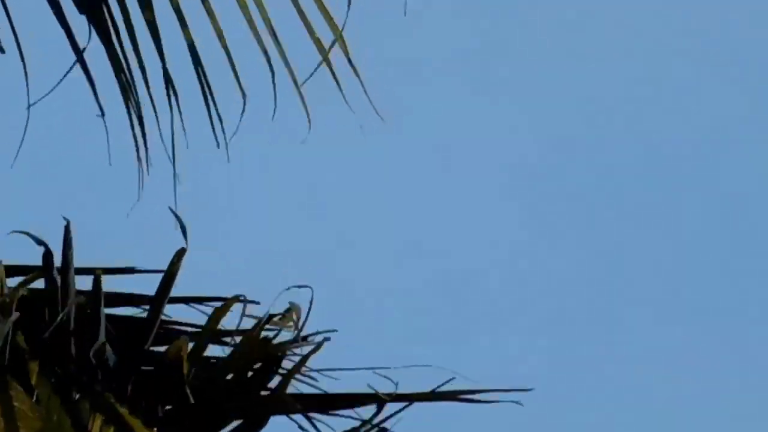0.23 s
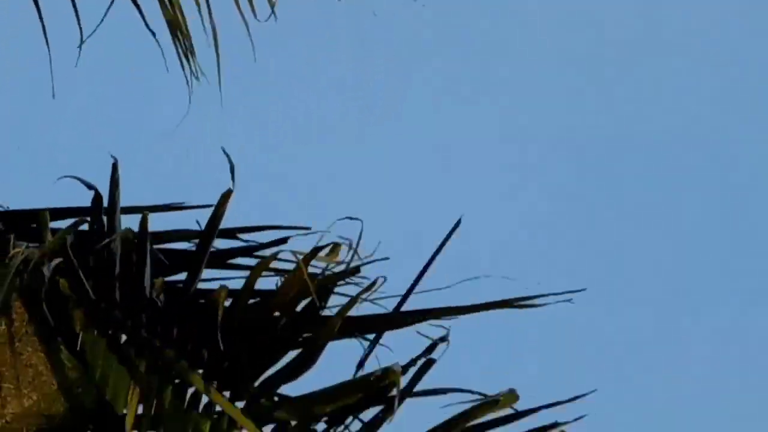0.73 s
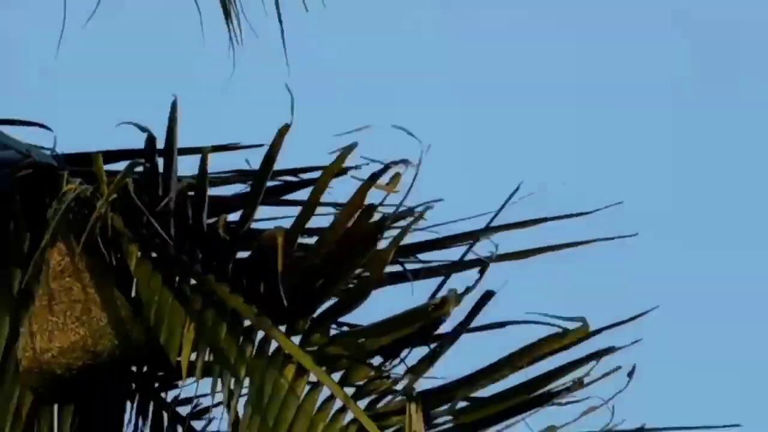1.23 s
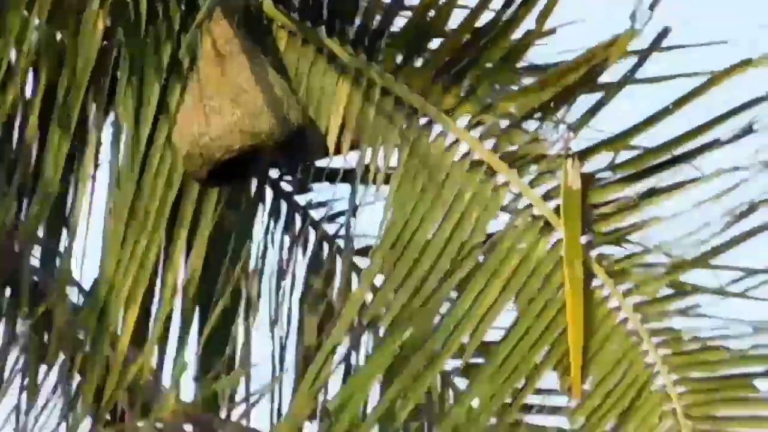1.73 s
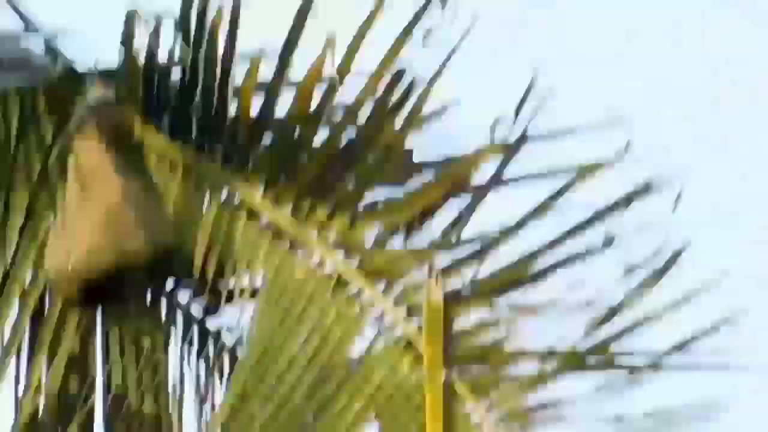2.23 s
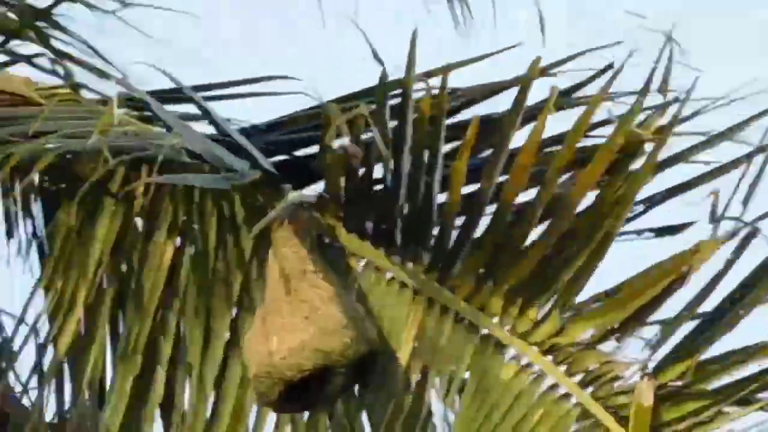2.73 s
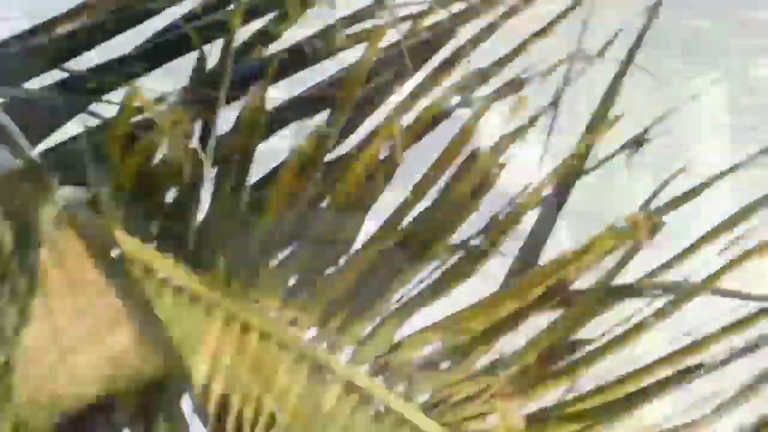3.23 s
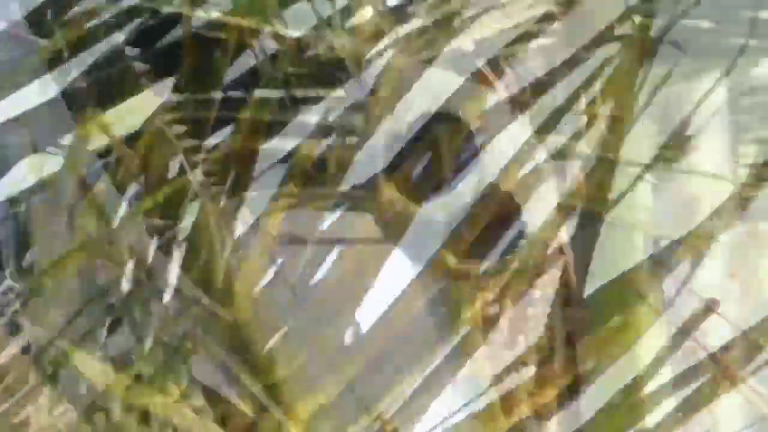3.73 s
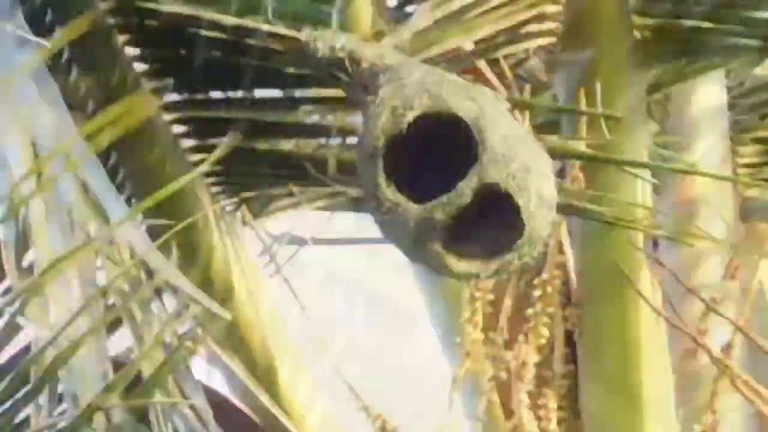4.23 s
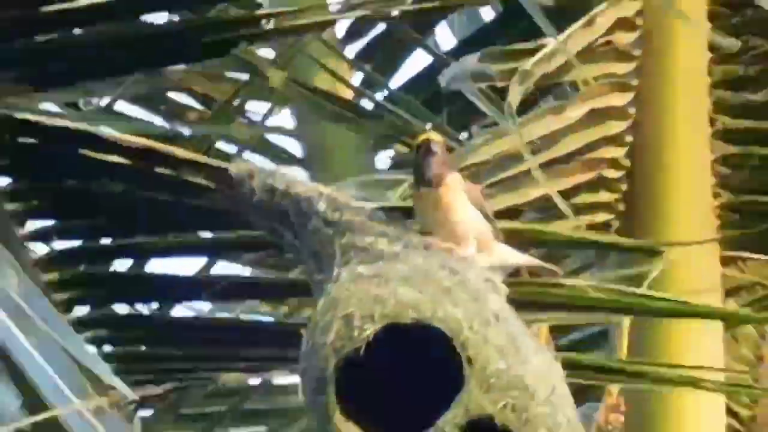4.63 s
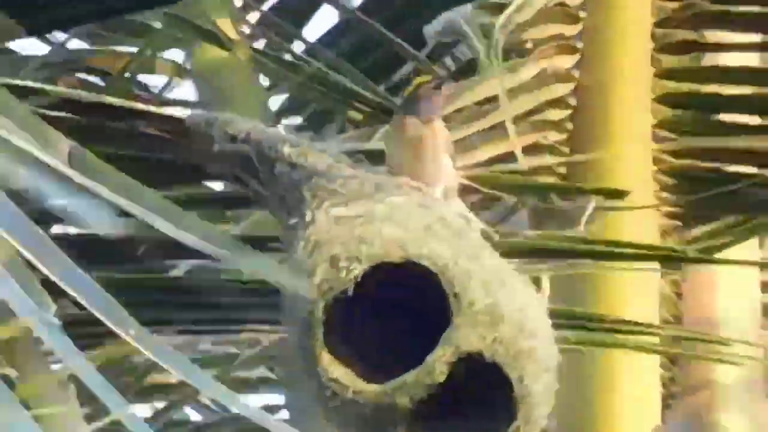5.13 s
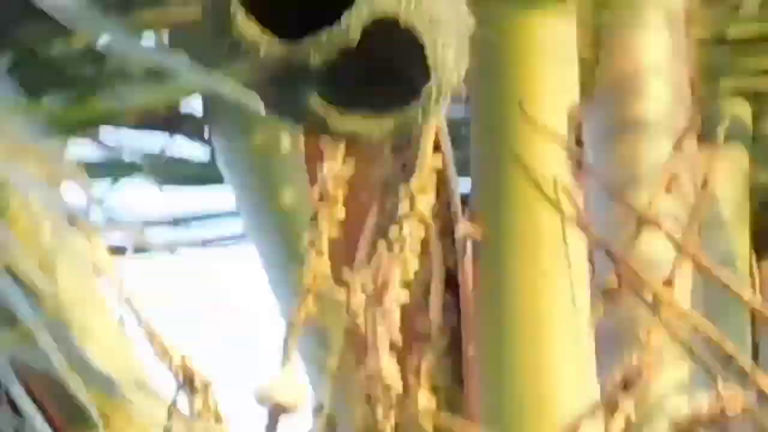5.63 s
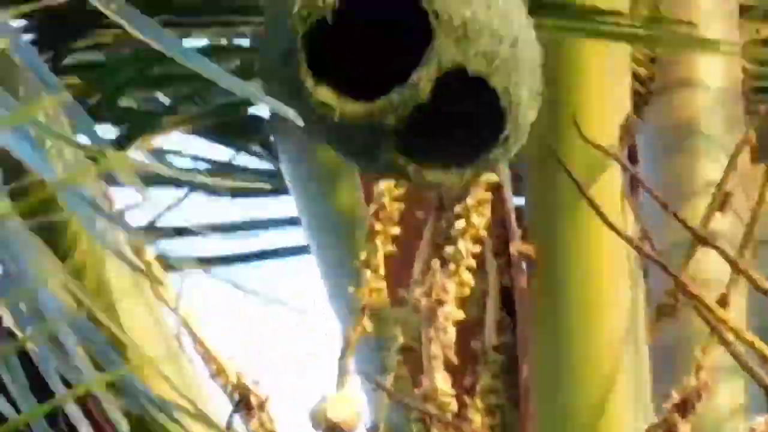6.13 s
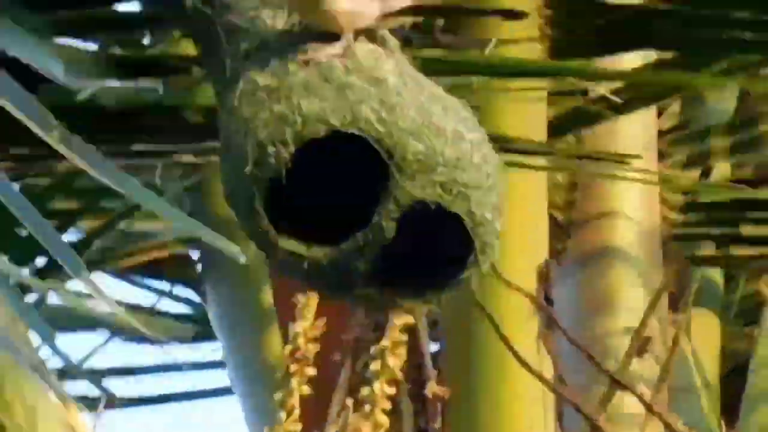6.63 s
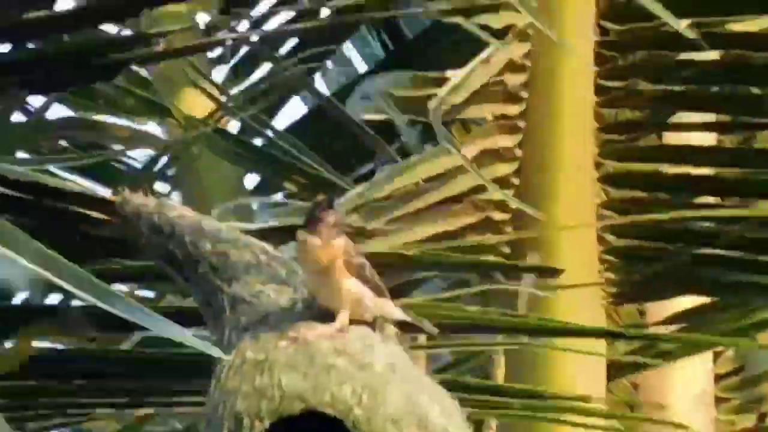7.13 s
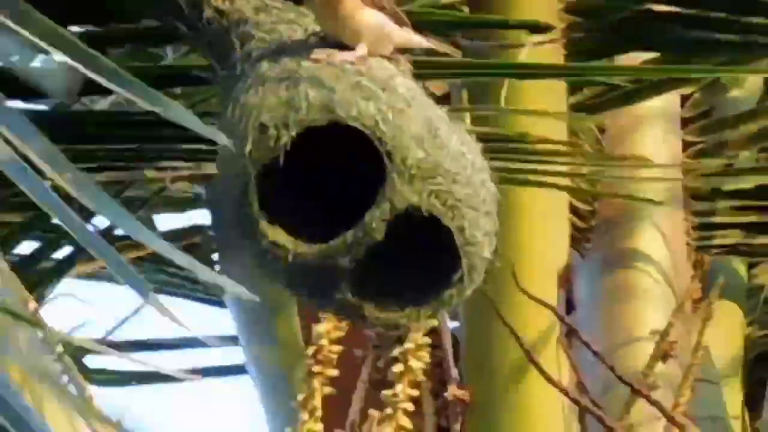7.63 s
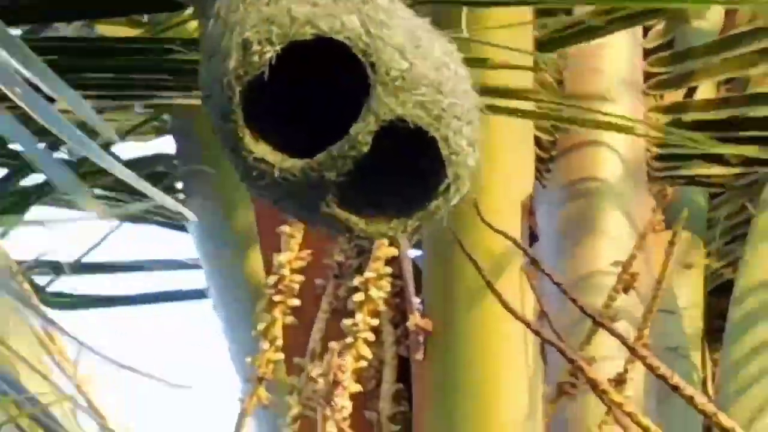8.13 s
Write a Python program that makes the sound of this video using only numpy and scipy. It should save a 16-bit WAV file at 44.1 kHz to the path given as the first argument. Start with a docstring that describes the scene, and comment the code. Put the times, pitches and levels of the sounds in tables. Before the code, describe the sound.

Outdoors in palm crowns, a soft airy hiss carries a few faint, very short high chirps and low wind rumble. The hiss dips near three seconds, then rises and stays louder while many small birds chirp closer and more often, each a falling warbled whistle blurred by leaves. A sudden gust pops and crackles on the stereo microphone at the end.

```python
"""Chirps from a colony of weaver birds in a palm crown, over a hiss of breeze in the fronds.
The level of the hiss dips, then comes up midway and stays louder.
Each chirp is a falling, warbled whistle from both sides of the syrinx, scattered by the leaves.
Fainter calls come from farther trees, and one short low hoot sounds far off.
Wind rumbles on the microphone as shaped noise; at the end a gust buffets its two ports with pressure pulses."""
import sys
import numpy as np
from scipy import signal
from scipy.fft import rfft, irfft, next_fast_len
from scipy.io import wavfile
from scipy.ndimage import uniform_filter1d, minimum_filter1d, map_coordinates

SR = 44100
rng = np.random.default_rng(int(sys.argv[2]) if len(sys.argv) > 2 else 0)


def put_to_file(sound):
    """Save the sound as 16-bit audio at rate SR, in the file named by the first command-line argument."""
    columns = np.atleast_2d(sound).T  # one column per channel
    safe = np.clip(columns, -1, 1)
    whole_steps = np.round(safe * 32767)
    wavfile.write(sys.argv[1], SR, whole_steps.astype(np.int16))


N = 370440
TIME = np.arange(N) / SR

# Kinds of call, before the pitch and length ratios of each single call. The pitch starts scoop_hz low and
# falls from top_hz to end_hz (bend over 1: steep at first; under 1: steep at last). The warble, warble_hz
# to either side, crests at crest_s and quickens from first_rate to last_rate [per s].
# second_*: the other side of the syrinx, its level [dB] relative to the first.
CHEEP = dict(length_s=.088, top_hz=5740, end_hz=4460, bend=3.7, scoop_hz=1000, warble_hz=253, crest_s=0.0103, first_rate=19.7, last_rate=127, attack_s=0.0059, release_s=0.056, second_top_hz=5280, second_end_hz=4770, second_warble_hz=220, second_db=-6)
ZIGZAG = dict(length_s=.066, top_hz=6260, end_hz=4170, bend=2.2, scoop_hz=1100, warble_hz=577, crest_s=-.001, first_rate=28, last_rate=74, attack_s=0.0098, release_s=.015, second_top_hz=5660, second_end_hz=4200, second_warble_hz=-450, second_db=-8.5)
SLUR = dict(length_s=.0635, top_hz=5560, end_hz=3370, bend=.42, scoop_hz=500, warble_hz=280, crest_s=-.0026, first_rate=7, last_rate=150.5, attack_s=.0135, release_s=.022, second_top_hz=6120, second_end_hz=5090, second_warble_hz=210, second_db=-6.5)
SWOOP = dict(length_s=.073, top_hz=6900, end_hz=4190, bend=6.1, scoop_hz=900, warble_hz=131, crest_s=-.005, first_rate=8.3, last_rate=98, attack_s=.036, release_s=0.049, second_top_hz=6250, second_end_hz=4760, second_warble_hz=-400, second_db=-7)
STEP = dict(length_s=.067, top_hz=5310, end_hz=3870, bend=1.5, scoop_hz=706, warble_hz=456, crest_s=0.01104, first_rate=22, last_rate=70.7, attack_s=0.032, release_s=0.023, second_top_hz=6450, second_end_hz=4860, second_warble_hz=-330, second_db=-16)
PIP = dict(length_s=.05, top_hz=6200, end_hz=5650, bend=3.1, scoop_hz=200, warble_hz=80, crest_s=0, first_rate=20, last_rate=23, attack_s=0.028, release_s=.012, second_top_hz=6650, second_end_hz=5600, second_warble_hz=0, second_db=-6)
SCOOP_S = 0.00349   # time constant of the swing up to pitch, before the length ratio

# Calls of the near birds, one table a kind: (time [s], level [dB], pitch [ratio], length [ratio],
# near echoes relative to the direct call [dB]: high for a bird deep in the leaves)
CHEEP_CALLS = [(3.452,-45.5,1,.96,-3),(3.808,-45,1.02,.99,-5),(4.154,-41,0.98,.95,-3),(4.698,-35,1.02,.98,-7),(4.809,-35,1.03,.91,0),(4.97,-37.5,1.02,.96,-3),(5.41,-38.5,1.02,.97,-5),(5.703,-39,0.99,.92,3),(5.74,-37.5,1.04,.9,8),(6.023,-36.5,0.98,.94,-3),(6.115,-40,1.04,.85,1),(6.431,-35.5,1.004,.99,-1),(6.963,-33.5,1.03,.94,-11),(7.078,-40,1,1.05,-2),(7.905,-41,1.02,1.1,0),(7.971,-38.5,.98,.96,-5)]
ZIGZAG_CALLS = [(3.688,-42.5,.972,1,-5),(4.415,-35,1,1.08,-1),(5.128,-34,0.99,1.03,1),(5.804,-33,0.97,0.98,1),(6.552,-34.5,.987,1.03,0),(7.211,-33.5,0.98,1.04,-7),(7.395,-31.5,.992,.99,-2),(7.667,-39.5,0.99,1,5),(8.297,-33,.973,1.04,-1)]
SLUR_CALLS = [(3.007,-51.5,1.01,0.93,-1),(3.877,-39,0.98,0.93,-2),(4.275,-40.5,0.98,1.04,-1),(4.835,-40,0.98,0.88,4),(5.198,-36.5,1.04,1.02,3),(6.353,-33.5,1,.9,-3),(6.852,-36,0.99,1.04,1),(8.093,-32,0.99,0.97,-1)]
SWOOP_CALLS = [(.318,-46,.984,1.23,0),(.762,-49.5,1.02,.85,-2),(.982,-47.5,.99,1.02,-5),(1.771,-46.5,1,1.02,1),(2.483,-51,1,1.05,-2),(2.882,-54,1.03,0.68,0)]
STEP_CALLS = [(.54,-44,.905,1.18,-7),(1.07,-58,.93,1,0),(1.448,-55,.93,1,0),(1.59,-62,0.86,1.2,0),(2.21,-54,1,1.05,1),(2.275,-56,0.9,.97,1),(2.671,-44.5,1.01,1.03,-9),(3.117,-47.5,0.95,0.97,-7),(4.079,-48,1.1,1.1,0),(4.532,-44,1.12,.97,4),(4.88,-43.5,1.05,1.1,-2),(6.14,-43,1,1.1,3),(7.046,-42,1.03,.88,-3),(7.63,-44.5,0.96,1.03,1)]
PIP_CALLS = [(.189,-61,1,.86,-5),(.662,-58,.69,1,3),(1.5,-55.5,1.1,.99,3),(1.645,-61,1,.86,-5),(1.921,-61,1.04,.81,-5),(2.233,-56,1.05,.91,-5),(2.748,-57,.87,.86,-6),(2.892,-60,.93,0.99,-3),(3.173,-57,.77,.83,-3),(4.855,-39,.87,.9,-3)]

# Breeze in the fronds, before the trims in breeze(): (time [s], rush level [dB], leaf hiss level [dB])
BREEZE = [(0,-54,-58),(1,-53.5,-58.5),(1.85,-54.7,-59),(2.35,-54,-58.5),(2.75,-59.5,-63.5),(3.05,-59,-63),(3.9,-51,-56.5),(4.35,-48,-55),(4.6,-43.5,-49.5),(6.2,-43.5,-49.5),(7,-44.5,-50.5),(8.1,-45.5,-50.5)]
# Relative spectra of the rush when quiet and when loud, and of the leaf hiss: (frequency [Hz], density [dB])
QUIET_RUSH_COLOUR = [(40,-14),(100,-2),(300,-3.5),(600,-1),(1100,0),(1550,-1),(2100,-2.5),(3000,-4.5),(4000,-8),(5000,-18),(7000,-14),(12000,-45)]
LOUD_RUSH_COLOUR = [(40,-11),(100,-4),(260,-6.5),(500,-3),(750,-1),(950,-3.5),(1400,-2.5),(2200,-2.5),(3100,-4),(3800,-7),(5000,-13),(7000,-16),(12000,-59)]
HISS_COLOUR = [(1500,-25),(3000,1),(4500,4.5),(7000,0),(10500,1),(15000,-2)]
# Left-right likeness of breeze and rumble: (frequency [Hz], correlation [-1 to 1])
LIKENESS = [(100, 0.72), (400, 0.77), (900, 0.67), (2000, 0.25), (4000, 0.02), (8000, -0.01), (15000, 0.04)]
# Balance of breeze, rumble and gust: (frequency [Hz], left minus right [dB])
LEAN = [(60, -0.2), (180, -0.6), (550, -0.15), (1650, -0.79), (4970, -1.0), (15000, -0.64)]

# Draught on the microphone: (time [s], level [dB])
RUMBLE = [(0,-55),(2.5,-54),(3.4,-67.5),(4.2,-65),(4.6,-59.5),(7.5,-63)]
# Puffs of wind that swell and die on the microphone: (time of the top [s], level [dB], half length [s])
PUFFS = [(.76,-46,.1),(.96,-44.5,0.089),(1.305,-51,.025),(1.68,-55.5,0.11),(5.6,-53,.08),(7.844,-43.5,.12),(8.1,-45,.07)]
# Relative spectrum of the rumble: (frequency [Hz], density [dB])
RUMBLE_COLOUR = [(20,-1),(50,2),(90,-6),(150,-11.5),(300,-21.5),(600,-37.5)]
# Turbulence of the gust at the two ports: (time [s], left level [dB], right level [dB])
GUST = [(8.08,-80,-80),(8.135,-50,-35),(8.155,-20.5,-37.5),(8.23,-25,-28.5),(8.26,-24.5,-29.5),(8.32,-28,-26),(8.4,-23,-27)]
# Relative spectrum of the gust: (frequency [Hz], density [dB])
GUST_COLOUR = [(20, -16), (70, 5), (200, -1.5), (400, -4.5), (700, -17.5), (1200, -28.5), (2200, -62)]
# Left-right likeness of the gust: (frequency [Hz], correlation [-1 to 1])
GUST_LIKENESS = [(25, .1), (70, .4), (160, 0), (2000, 0)]
# Single eddies that hit a port, one early, the others in the gust:
# (time [s], peak level [dB], width [s], left minus right [dB])
BUFFETS = [(.817,-28,0.0019,-19),(8.149,-10,0.00086,30),(8.1587,-6.5,0.00057,30),(8.174,-9.5,.00051,27),(8.2337,-10,.00036,29),(8.2356,-11.5,0.00079,30),(8.293,-17,.00053,26),(8.3285,-12,.0006,26),(8.3617,-10,0.0012,-13)]
# Further eddies, at random once the gust has arrived; the right port takes the broader ones
GUST_START_S, EDDIES_PER_S, EDDY_DB, EDDY_SPREAD_DB = 8.16, 45, -16, 1.5
EDDY_WIDTH_S, EDDY_PAN_DB = (0.00057, 0.0014), 25   # widths at the left and right port

# Harmonics of the far hoot: (multiple of the pitch, relative level [dB])
HOOT = [(1,2),(2,4),(3,-3),(4,-5),(5,-5)]

CUTOFF_HZ = 15450   # top of the recorder's band


def colony(distant_db=-63):
    """Near birds in the crown one by one, and a scatter of faint calls from farther trees."""
    repertoire = [(CHEEP, CHEEP_CALLS), (ZIGZAG, ZIGZAG_CALLS), (SLUR, SLUR_CALLS),
                  (SWOOP, SWOOP_CALLS), (STEP, STEP_CALLS), (PIP, PIP_CALLS)]
    near = sum(chirps(kind, calls) for kind, calls in repertoire)
    lean_db = np.array([[-.4], [.4]])   # near birds sit slightly to the right
    # the farther the call, the fainter it is and the more echo it carries
    scatter = [(s * N / SR, distant_db - 6 * far, .8 + .4 * pitch, 1, 6 * far)
               for s, far, pitch in rng.random((30, 3))]
    return near * from_db(lean_db) + chirps(CHEEP, scatter, tail_db=0)


def chirps(kind, calls, tail_db=-9, waver=0.01205, octave_db=-26):
    """A bird sings with both sides of the syrinx, which beat against each other; its power rises, holds and falls."""
    out = np.zeros((2, N))
    for s, level_db, pitch, length, echo_db in calls:
        t = np.arange(int(kind["length_s"] * length * SR)) / SR / length   # stretched with the call
        first_hz, second_hz = syrinx(t, **kind)
        voice = whistle(pitch * first_hz, waver)
        voice += from_db(octave_db) * whistle(2 * pitch * first_hz, waver)
        voice += from_db(kind["second_db"]) * whistle(pitch * second_hz, 2 * waver)
        rise = np.clip(t / kind["attack_s"], 0, 1)
        fall = np.clip((t[-1] - t) / kind["release_s"], 0, 1)
        call = voice * np.sqrt(rise * fall) * from_db(level_db)
        add(out, s, foliage(call, echo_db, tail_db))
    return out


def syrinx(t, length_s, top_hz, end_hz, bend, scoop_hz, warble_hz, crest_s, first_rate, last_rate,
           second_top_hz, second_end_hz, second_warble_hz, **_):
    """Pitch of both sides: each swings up and then falls, under a shared warble that quickens toward the end."""
    to_go = np.clip(1 - t / length_s, 0, 1)
    # the warble rate grows linearly, so the turns since the crest grow with the square of time
    turns = first_rate * (t - crest_s)
    turns += (last_rate - first_rate) * (t ** 2 - crest_s ** 2) / (2 * length_s)
    warble = np.cos(2 * np.pi * turns)
    scoop = scoop_hz * np.exp(-t / SCOOP_S)
    first_fall = end_hz + (top_hz - end_hz) * to_go ** bend
    second_fall = second_end_hz + (second_top_hz - second_end_hz) * to_go
    return first_fall + warble_hz * warble - scoop, second_fall + second_warble_hz * warble - scoop


def whistle(hz, waver):
    """One side of the syrinx: a near sine whose pitch trembles."""
    trembling_hz = hz * (1 + waver * drift(500, size=len(hz)))
    return np.sin(2 * np.pi * np.cumsum(trembling_hz) / SR)


def foliage(call, near_db, tail_db):
    """The direct call shares its power with echoes from the nearest fronds and a faint tail from the grove."""
    t = np.arange(SR // 4) / SR
    fronds = rng.random((2, len(t))) < 1500 / SR   # 1500 echoes per second, thinning in strength
    near = rng.standard_normal((2, len(t))) * fronds * np.exp(-t / .0065)
    near = near + 0.56 * near[::-1]   # echoes from the front reach both ports alike
    tail = rng.standard_normal((2, len(t))) * np.exp(-t / .028)
    paths = from_db(near_db) * rms_one(near) + from_db(tail_db) * rms_one(tail)
    paths /= np.sqrt(len(t))
    paths[:, 0] += 1   # the direct path
    paths /= np.sqrt((paths ** 2).sum() / 2)
    return signal.fftconvolve(call[None], paths, axes=1)


def breeze(quiet_db=-54, span_db=8, rush_trim_db=2.5, hiss_trim_db=6.0):
    """Air rushes through the crowns, its colour shifting with the level, while leaflets hiss; both flutter slightly."""
    rush_db, hiss_db = in_time(BREEZE)
    loudness = np.clip((rush_db - quiet_db) / span_db, 0, 1)
    air = np.sqrt(1 - loudness) * air_noise(QUIET_RUSH_COLOUR)
    air += np.sqrt(loudness) * air_noise(LOUD_RUSH_COLOUR)
    rush = from_db(rush_db + 0.75 * drift(14) + rush_trim_db) * air
    hiss = from_db(hiss_db + .5 * drift(16) + hiss_trim_db) * air_noise(HISS_COLOUR)
    return rush + hiss


def microphone_wind():
    """Lumpy rumble that swells in puffs, and eddies that hit each port as short pressure pulses, most in a last gust."""
    rumble_db, = in_time(RUMBLE)
    power = from_db(rumble_db) ** 2
    for s, level_db, half_s in PUFFS:
        power += from_db(level_db) ** 2 * np.exp(-((TIME - s) / half_s) ** 2)
    out = np.sqrt(power) * from_db(1.5 * drift(16)) * air_noise(RUMBLE_COLOUR)
    gust_db = np.array(in_time(GUST)) + 3.3 * drift(90)
    out += from_db(gust_db) * air_noise(GUST_COLOUR, GUST_LIKENESS)
    t = np.arange(-SR // 100, SR // 100) / SR
    for s, peak_db, width_s, pan_db in list(BUFFETS) + eddies():
        u = t / width_s
        eddy = (2 * u ** 2 - 1) * np.exp(-u ** 2)   # a suction core between two rims of pressure
        port_db = peak_db + np.minimum([[pan_db], [-pan_db]], 0)   # only the sheltered port is lowered
        add(out, s + t[0], eddy * from_db(port_db))
    return out


def eddies():
    """Further eddies of the gust, unevenly spaced, each mostly on one port: rows as in BUFFETS."""
    rows = []
    for start in np.arange(GUST_START_S, N / SR, 1 / EDDIES_PER_S):
        late, size, port = rng.random(3)
        peak_db = EDDY_DB + EDDY_SPREAD_DB * (2 * size - 1)
        pan_db = EDDY_PAN_DB * np.sign(.5 - port)
        rows.append((start + late / EDDIES_PER_S, peak_db, EDDY_WIDTH_S[int(port > .5)], pan_db))
    return rows


def hoot(s=2.257, pitch_hz=230, width_s=.022, level_db=-49, waver=.01):
    """A short, far animal call: wavering harmonics under a bell-shaped swell, with a strong tail from the grove."""
    phase = 2 * np.pi * np.cumsum(pitch_hz * (1 + waver * drift(150))) / SR
    tone = sum(from_db(db) * np.sin(round(multiple) * phase) for multiple, db in HOOT)
    call = from_db(level_db) * tone * np.exp(-((TIME - s) / width_s) ** 2)
    return foliage(call, near_db=-21, tail_db=2)[:, :N]


def air_noise(colour, likeness=LIKENESS):
    """Stereo noise with a given spectrum and likeness of the channels; rms 1."""
    size = next_fast_len(N)
    hz = np.maximum(np.fft.rfftfreq(size, 1 / SR), 1)
    mid, side = rfft(rng.standard_normal((2, size)))
    alike = np.clip(at_hz(likeness, hz), -1, 1)
    pair = np.sqrt(1 + alike) * mid + np.sqrt(1 - alike) * side * [[1], [-1]]
    lean = from_db(at_hz(LEAN, hz) * [[.5], [-.5]])
    spectrum = pair * lean * from_db(at_hz(colour, hz)) * (hz > 12)
    return rms_one(irfft(spectrum, size)[:, :N])


def drift(rate, size=N):
    """Smooth chance of spread 1 that turns about rate times a second."""
    knots = rng.standard_normal(int(size * rate / SR) + 4)
    return map_coordinates(knots, [1 + np.arange(size) * rate / SR], order=1) * np.sqrt(3 / 2)


def from_db(db):
    """Decibels to gain."""
    return 10 ** (np.asarray(db) / 20)


def rms_one(x):
    """Scale to an rms of 1."""
    return x / np.sqrt(np.mean(x ** 2) + 1e-20)


def in_time(rows, t=TIME):
    """The columns of a curve at the times t."""
    s, *columns = np.transpose(rows)
    return [np.interp(t, s, column) for column in columns]


def at_hz(points, hz):
    """Read a spectrum on a log-frequency axis."""
    f, value = np.transpose(points)
    return np.interp(np.log(hz), np.log(f), value)


def add(out, s, sound):
    """Mix a sound into the stereo track from second s on."""
    i = max(round(s * SR), 0)
    out[:, i:i + sound.shape[-1]] += sound[..., :max(N - i, 0)]


def suppressor(x, depth_db=3.0, open_db=9):
    """The treble is held down while only hiss is there, and opens when a chirp or other burst stands out of it."""
    chirp_band = signal.butter(2, [3500, 6500], "band", fs=SR, output="sos")
    power = (signal.sosfilt(chirp_band, x) ** 2).mean(0)
    level_db = 10 * np.log10(uniform_filter1d(power, size=1100) + 1e-12)
    floor_db = minimum_filter1d(level_db, size=15000)
    opening = np.clip((level_db - floor_db) / open_db, 0, 1)
    treble = signal.sosfiltfilt(signal.butter(2, 4500, "high", fs=SR, output="sos"), x)
    gain = from_db(depth_db * (opening - 0.5))   # half the depth down when closed, half up when open
    return x + treble * (gain - 1)


def scene():
    """Birds in the crown, breeze around them, wind on the microphone and the far hoot."""
    return colony() + breeze() + microphone_wind() + hoot()


def record(dry):
    """The recorder tones down the hiss and cuts the top steeply."""
    top_cut = signal.ellip(12, .1, 80, CUTOFF_HZ, fs=SR, output="sos")
    return signal.sosfilt(top_cut, suppressor(dry))


dry = scene()
out = record(dry)
put_to_file(out)
```